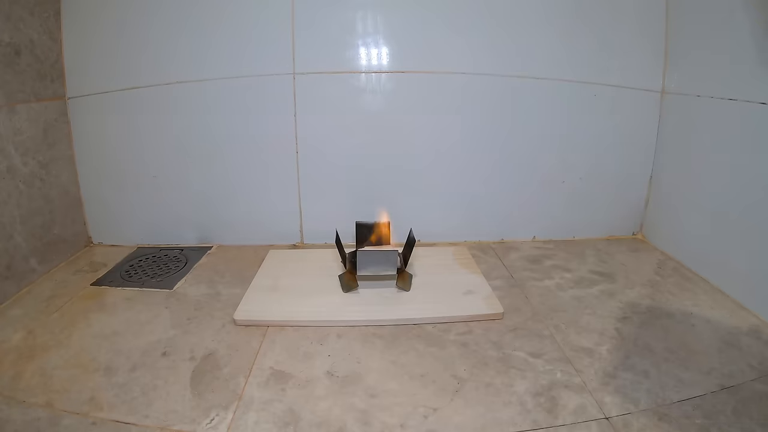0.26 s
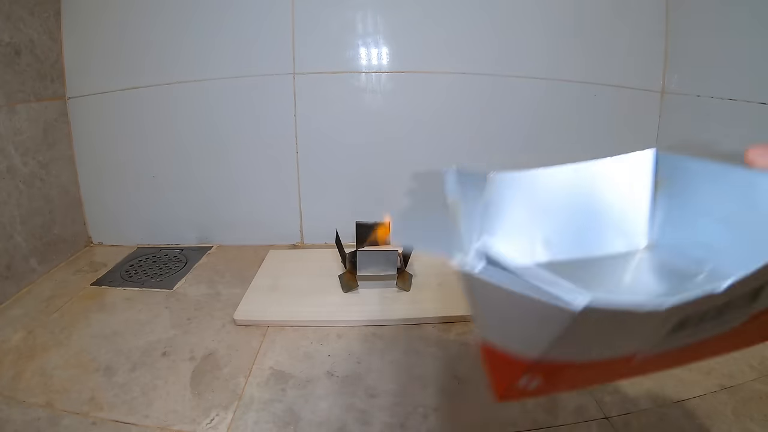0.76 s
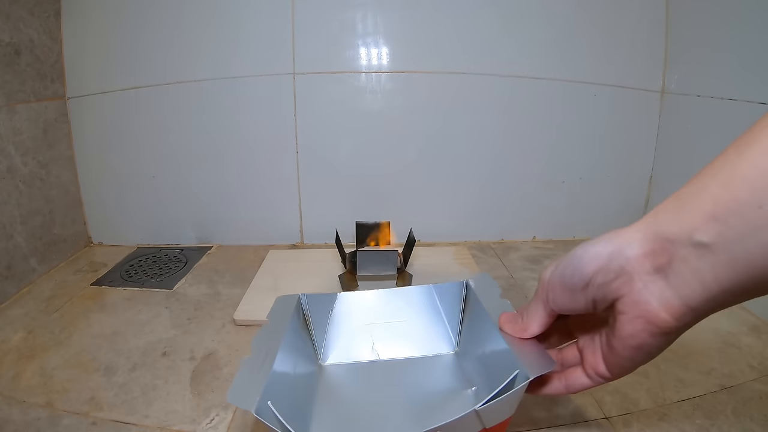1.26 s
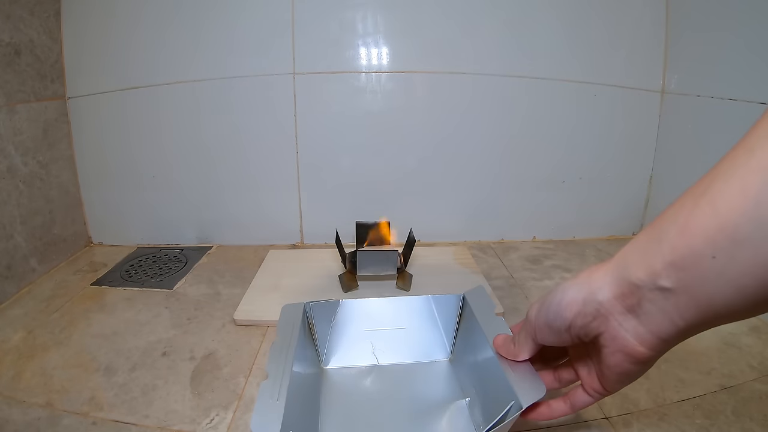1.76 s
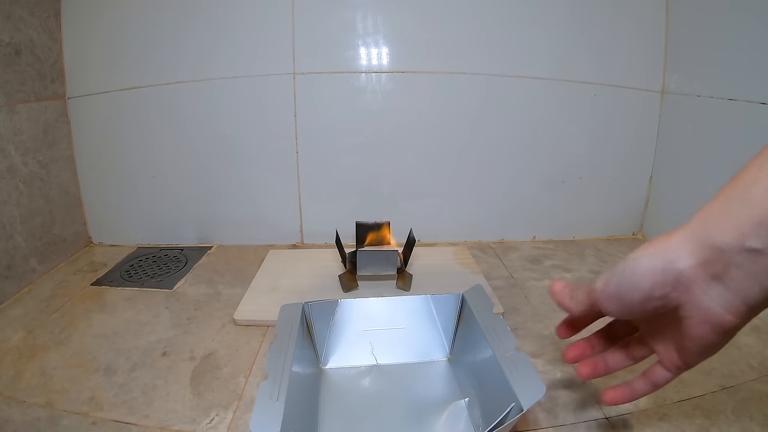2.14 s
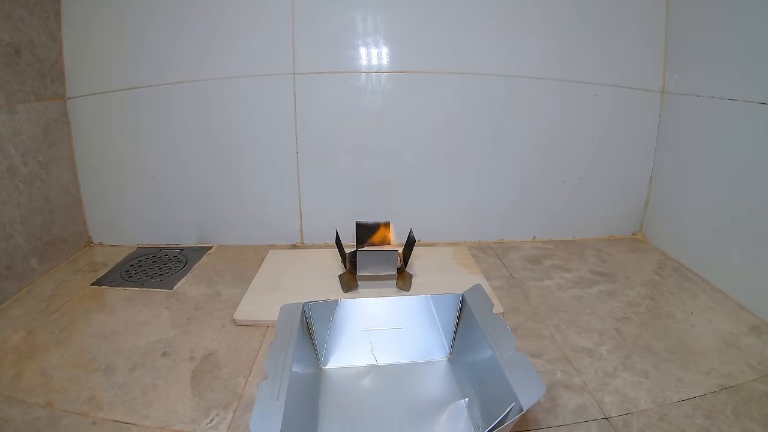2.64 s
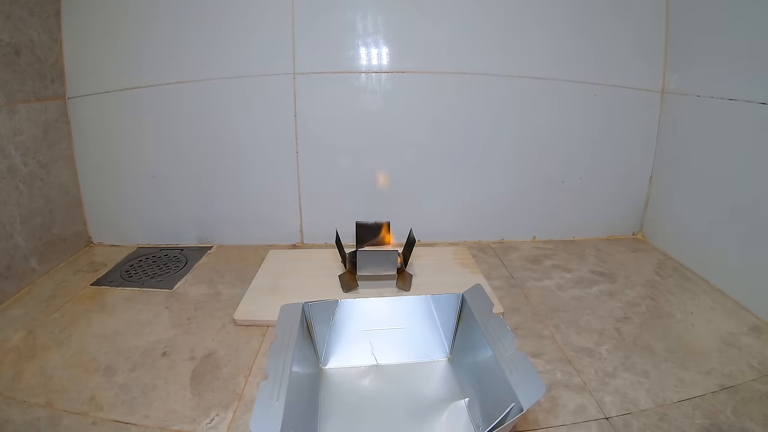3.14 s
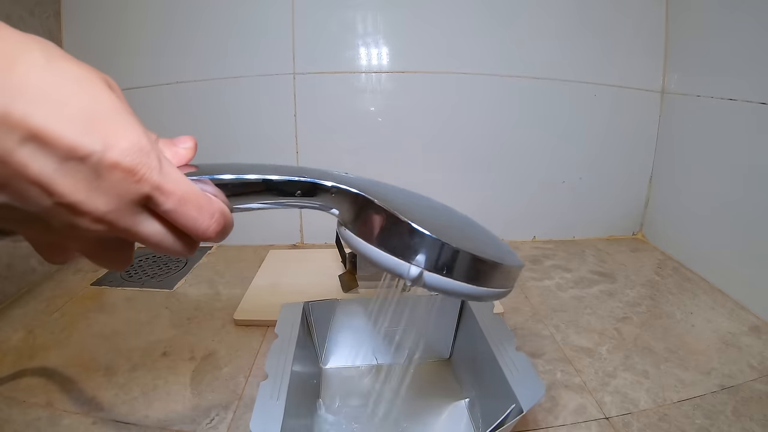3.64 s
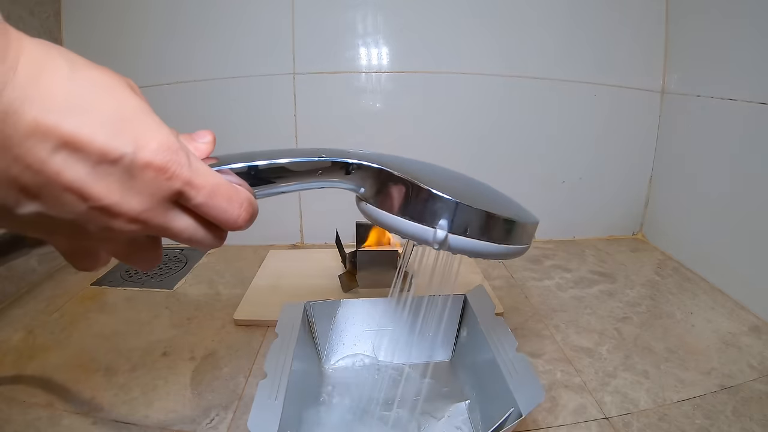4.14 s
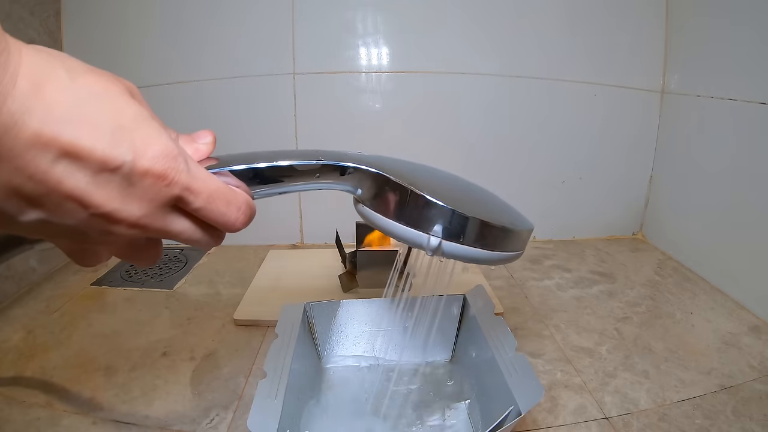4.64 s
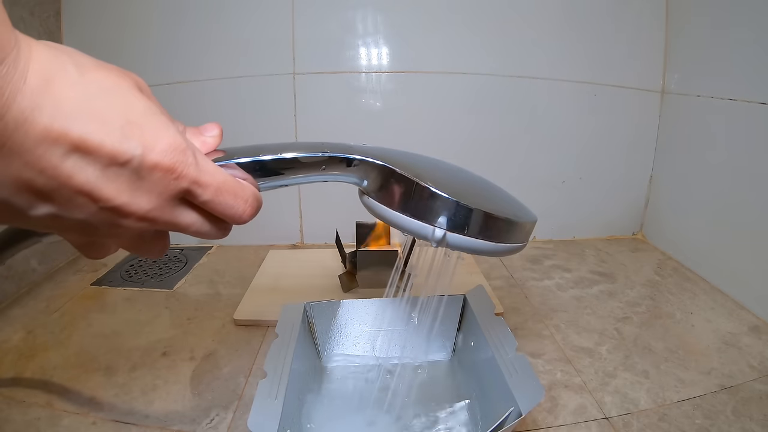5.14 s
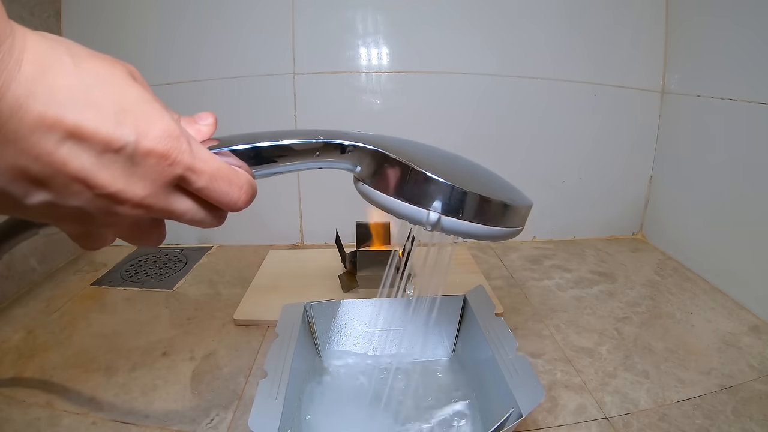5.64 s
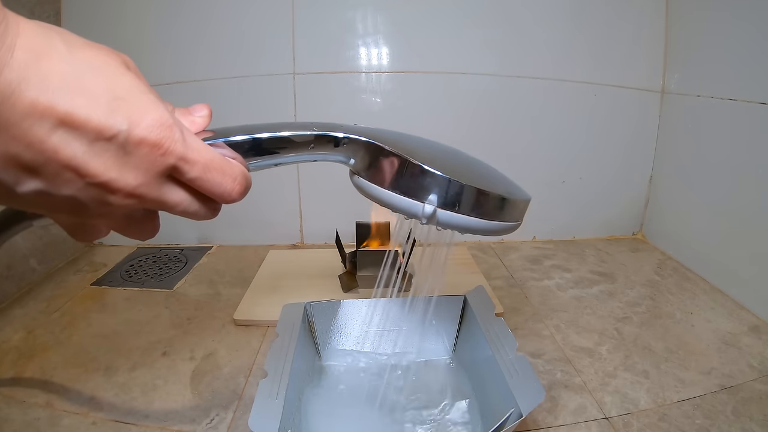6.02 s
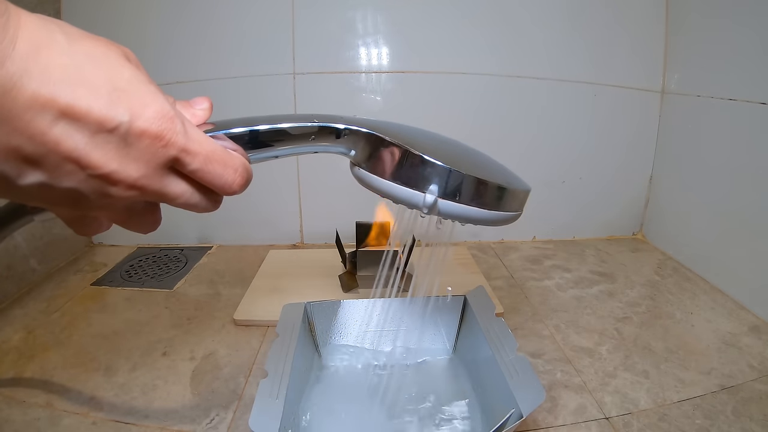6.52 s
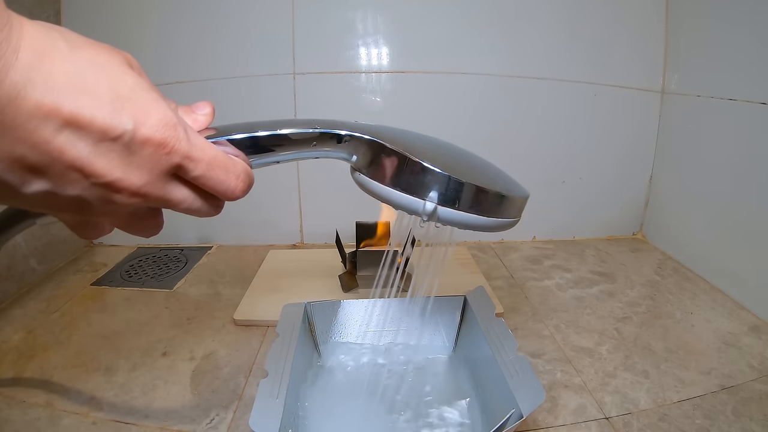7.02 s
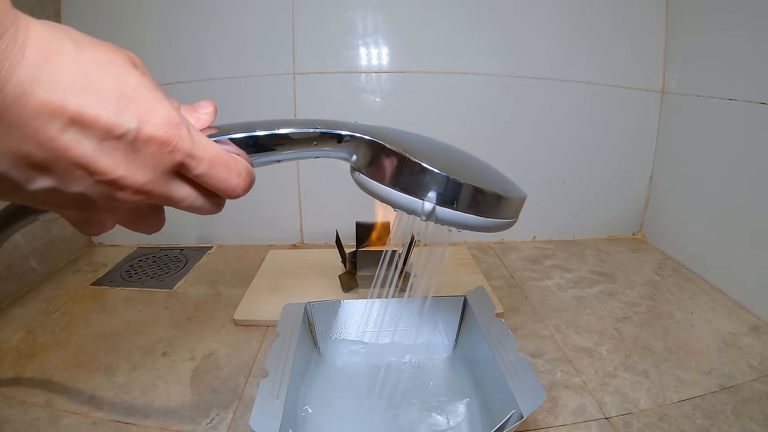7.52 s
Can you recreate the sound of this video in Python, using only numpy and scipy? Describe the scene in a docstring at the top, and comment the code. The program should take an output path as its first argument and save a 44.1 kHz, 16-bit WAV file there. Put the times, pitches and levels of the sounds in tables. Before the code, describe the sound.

Over a low rumble in a tiled shower stall, a folded cardboard pot rustles faintly and is set down with a hollow knock. A few small ticks and rubs follow. A handheld shower head then drips, spits and sprays loudly into the pot, drumming on the card at first, then splashing and bubbling as the water deepens. The microphone is close and the tiles add a short echo.

```python
"""A low rumble fills a tiled shower stall. A folded cardboard pot rustles, knocks down on the floor
and is let go. The shower head is picked up with small ticks and rubs. It drips, spits, then sprays
into the pot: drops splash and drum on the card, and bubbles take over as the water deepens.
The tiles echo throughout, and a close mono microphone turns its gain down under the spray."""
import sys
import numpy as np
from scipy import signal
from scipy.fft import rfft, irfft
from scipy.io import wavfile
from scipy.ndimage import uniform_filter1d

SR = 44100
rng = np.random.default_rng(int(sys.argv[2]) if len(sys.argv) > 2 else 0)


def persist_wave(psi):
    """Save psi, clipped to +-1, as 16-bit WAV."""
    counts = np.round(np.clip(psi, -1, 1) * 32767).astype(np.int16)
    wavfile.write(sys.argv[1], SR, np.atleast_2d(counts).T)


N = 342657
TIME = np.arange(N) / SR


def undb(db):
    """Turn decibels into a number to multiply by."""
    return 10 ** (np.asarray(db) / 20)


def unit(x):
    """Scale a sound to an average (rms) level of 1."""
    return x / np.sqrt(np.mean(x ** 2))


def at_pitch(points, hz):
    """Read between (pitch_hz, value) points, with every octave equally wide."""
    pitches, values = np.transpose(points)
    return np.interp(np.log(np.maximum(hz, 1)), np.log(pitches), values)


def convolve(x, response):
    """Let every sample of x set off its own copy of the response."""
    return signal.fftconvolve(x, response)[:N]


def colour(points, size=16384):
    """A click of energy 1 with the tone of (pitch_hz, level_db) points, for use as a filter."""
    cepstrum = irfft(np.log(undb(at_pitch(points, np.fft.rfftfreq(size, 1 / SR)))))
    # fold the second half onto the first, so nothing sounds before the click starts
    cepstrum[1:size // 2] *= 2
    cepstrum[size // 2 + 1:] = 0
    response = irfft(np.exp(rfft(cepstrum)))
    return response / np.linalg.norm(response)


def resonate(x, peaks):
    """Make a sound ring at each (pitch_hz, width_hz, level_db) peak."""
    return sum(undb(db) * signal.lfilter(*signal.iirpeak(hz, hz / width, fs=SR), x)
               for hz, width, db in peaks)


def wander(rate_hz):
    """A smooth random drift, mostly between -1 and 1."""
    hold = int(SR / rate_hz)
    steps = np.repeat(rng.standard_normal(N // hold + 1), hold)
    return 1.2 * uniform_filter1d(steps, hold)[:N]


def impacts(per_s, spread_db):
    """Tiny clicks of unequal size at random times."""
    hit = rng.random(N) < per_s / SR
    size = undb(spread_db * np.clip(rng.standard_normal(N), -3, 3))
    return unit(hit * size * rng.choice([-1, 1], N))


def swell(start_s, length_s, rise_s, fade_s):
    """A level that rises, holds until its length is over and dies away."""
    age = TIME - start_s
    return np.clip(age / rise_s, 0, 1) * np.exp(-np.maximum(age - length_s, 0) / fade_s)


# tone of the background rumble: pitch_hz, level_db
RUMBLE_TONE = [(4, -2), (15, -1), (22, -2.5), (33, -14), (49, -8), (68, -15.5), (90, -20), (125, -30.5),
               (220, -39), (400, -43.5), (800, -42.5), (1600, -51.5), (4000, -53), (9000, -55),
               (16000, -65)]
# notes of the air between the walls (standing waves): pitch_hz, width_hz, level_db
STALL_NOTES = [(87, 3.4, 5), (181.4, 26, -10.5), (256.5, 7.8, -9.5), (346.7, 9.5, -10.5), (421, 2.2, -9),
               (586, 3.6, -15), (695, 13, -23)]

def room_tone(rumble_db=-33, hum_db=-48):
    """A deep, unsteady rumble with faint hiss, and the hum of the air in the stall."""
    rumble = convolve(rng.standard_normal(N), colour(RUMBLE_TONE)) * undb(rumble_db + 0.55 * wander(8.9))
    hum = unit(resonate(rng.standard_normal(N), STALL_NOTES))
    return rumble + undb(hum_db) * hum


# time the echoes take to fade by 60 dB: pitch_hz, ring_s
ECHO_FADE = [(150, 1), (400, 0.44), (1000, 0.99), (2800, 0.53), (7300, 0.3), (15000, 0.093)]
# tone of the echoes: pitch_hz, level_db
ECHO_TONE = [(130, -5.5), (350, 1.5), (800, 5.5), (2000, 2), (6000, -1.5), (16000, 5.5)]

def tile_echoes(sound, gap_s=0.004):
    """Sound bounces between the tiled walls in a blur of echoes; the treble dies first."""
    t, tail = TIME[:SR], 0
    spectrum = rfft(rng.standard_normal(SR))
    pitches = np.maximum(np.fft.rfftfreq(SR, 1 / SR), 1)
    for hz in 125 * 2 ** np.arange(8):
        octave = irfft(spectrum * np.maximum(1 - np.abs(np.log2(pitches / hz)), 0))
        tail = tail + octave * undb(-60 * t / at_pitch(ECHO_FADE, hz))
    tail = tail * (t > gap_s)
    echoes = convolve(sound, tail / np.linalg.norm(tail))
    return convolve(echoes, colour(ECHO_TONE))


# tone of rubbing: pitch_hz, level_db
RUB_TONE = [(200, -46), (700, -28), (1800, 10), (4000, 6), (7500, 9), (11000, -1), (16000, -28)]
# the pot is carried, slid and let go, then the hose is drawn up: start_s, length_s, rub_db, flex_db
STROKES = [(.4, 0.34, -65, -55), (.55, 0.43, -72, -57), (0.866, 0.39, -72, -49), (1.625, .22, -50.5, -46.5),
           (1.93, 0.15, -48.5, -48), (2.173, 0.099, -64, -47), (2.477, 0.3, -56, -56),
           (2.788, 0.11, -53, -71), (3.036, 0.69, -57, -57)]

def handling(level_db=-2, catch_db=2.5):
    """Rubbing is many tiny slips that catch now and then; flexing card drones on its low notes."""
    rub = convolve(impacts(per_s=3000, spread_db=3), colour(RUB_TONE)) * undb(catch_db * wander(40))
    flex_notes = [(269, 20, 13), (342, 8.4, 4), (396, 11, 2), (800, 390, -17)]
    flex = unit(resonate(impacts(per_s=390, spread_db=5.5), flex_notes))
    out = np.zeros(N)
    for start, length, rub_db, flex_db in STROKES:
        speed = np.sin(np.pi * np.clip((TIME - start) / length, 0, 1))  # speeds up, then slows
        out += speed ** 0.66 * (undb(rub_db) * rub + undb(flex_db) * flex)
    return undb(level_db) * out


# small ticks: start_s, level_db, body_db (added to level_db for the duller part)
TICK_TIMES = [(.468, -43, -14), (.575, -44, -12), (.605, -40, -17), (.646, -49, -6), (1.303, -47, -10),
              (1.854, -38.5, -10), (1.982, -40, -3), (1.998, -39, -1), (2.104, -40, -11), (2.202, -41, -8),
              (2.801, -30.5, -27), (3.307, -40, -8), (3.332, -49.5, -12), (3.378, -41, -18)]
# tone of a tick's bright part: pitch_hz, level_db
TICK_TONE = [(200, -3), (1500, -8.5), (4000, -5), (7300, 0), (10500, -6.5), (16000, -15)]

def ticks(fade_s=0.0071, bright_db=-8, dull_db=-9):
    """The card and the shower head give brief crackles, each with a duller body."""
    t, crack, body = TIME[:SR // 10], np.zeros(N), np.zeros(N)
    for start, db, body_db in TICK_TIMES:
        burst = undb(db) * rng.standard_normal(len(t)) * np.exp(-t / fade_s)
        i = int(start * SR)
        crack[i:i + len(t)] += burst
        body[i:i + len(t)] += burst * undb(body_db)
    dull = colour([(160, -36), (550, -16), (1700, -16), (2400, -7), (6000, -1)])
    return undb(bright_db) * convolve(crack, colour(TICK_TONE)) + undb(dull_db) * convolve(body, dull)


# the pot meets the floor, settles and is let go: start_s, level_db, contact_s
POT_KNOCKS = [(1.498, -10, 0.00049), (1.5048, -1, 0.0025), (1.683, -26, 0.00082), (1.745, -31, 0.00059),
              (1.984, -25.5, 0.00031), (1.997, -40, 0.00096)]
# the first lumps of water thump the dry bottom: start_s, level_db
WATER_THUMPS = [(3.59, -16), (3.621, -10.5), (3.82, -16), (3.933, -12)]
# notes of the struck pot: pitch_hz, level_db, ring_s (time to fade by 60 dB)
POT_NOTES = [(189.6, -23.5, 0.44), (308, -18, 0.11), (337, -1.5, 0.06), (346, -3, 0.24), (396, -10.5, .2),
             (477, -2.5, 0.038), (616, -13.5, 0.3), (670, -11, 0.037), (715, -23, 0.046), (830, -10, 0.028),
             (1070, -10, 0.068), (1180, -25, 0.052), (1666, -5, 0.064), (3130, -7, 0.025)]
# tone of loose card slapping: pitch_hz, level_db
SLAP_TONE = [(100, -31), (200, -9), (350, -3), (700, -25), (1200, -7), (2000, -26), (3400, -14), (9000, -7),
             (16000, -32)]

def knocks(ring_db=-13, water_contact_s=0.0025, slap_db=-23, slap_s=0.015):
    """Each blow rings the pot and slaps its loose card; a longer contact sounds duller."""
    t, pushes = TIME[:SR], np.zeros(N)
    ring = sum(undb(db - 60 * t / ring_s) * np.cos(2 * np.pi * hz * t) for hz, db, ring_s in POT_NOTES)
    slap = convolve(rng.standard_normal(SR) * np.exp(-t / slap_s), colour(SLAP_TONE))
    thumps = [(start, db, water_contact_s) for start, db in WATER_THUMPS]
    for start, db, contact_s in POT_KNOCKS + thumps:
        push = np.exp(-2 * np.pi * t[:SR // 10] / contact_s)
        i = int(start * SR)
        pushes[i:i + len(push)] += undb(db) * push / push.sum()
    return undb(ring_db) * convolve(pushes, ring) + undb(slap_db) * convolve(pushes, slap)


# lone fat drops ahead of the spray: start_s, level_db
DRIPS = [(3.448, -28.5), (3.495, -37), (3.504, -46), (3.542, -27), (3.554, -22)]

def drips(splat_s=0.0053, bright_db=-7, spatter_db=-15):
    """Each drop flattens on the dry card and rings the same notes as the spray below."""
    t, splats = TIME[:SR // 20], np.zeros(N)
    for start, db in DRIPS:
        i = int(start * SR)
        splats[i:i + len(t)] += undb(db) * rng.standard_normal(len(t)) * np.exp(-t / splat_s)
    card = resonate(splats, BOTTOM_NOTES) + undb(bright_db) * resonate(splats, DRY_NOTES)
    return card + undb(spatter_db) * convolve(splats, colour(SPLASH_TONE))


FIRST_SPURT_S, STEADY_FLOW_S, FLOW_RISE_S = 3.488, 3.722, 0.019

def depth(fill_s=3.365):
    """The pool deepens steadily from 0 (dry) to 1 (as deep as the jets reach)."""
    return np.clip((TIME - STEADY_FLOW_S) / fill_s, 0, 1)


def covered(halfway_s=4.89, spread_s=0.19):
    """How much of the pot's bottom lies under water, from 0 to 1."""
    return 0.5 + 0.5 * np.tanh((TIME - halfway_s) / (2 * spread_s))


# how loud a bubble of each pitch is: pitch_hz, level_db
BUBBLE_LEVELS = [(400, -24), (630, -7.5), (780, -5), (950, 1), (1250, -2.5), (1600, -3), (3000, -15)]

def bubbles(count=4500, cycles=14, glide=0.11, spread_db=2, shallow_hz=878, deep_hz=454):
    """Trapped air rings briefly and rises in pitch; deeper water holds larger, lower bubbles."""
    out = np.zeros(N + SR)
    lowest_hz = shallow_hz * (deep_hz / shallow_hz) ** depth()
    for when, smallness, strength in rng.random((count, 3)):
        i = int((FIRST_SPURT_S + when * (TIME[-1] - FIRST_SPURT_S)) * SR)
        hz = lowest_hz[i] * 4.17 ** smallness  # up to about two octaves higher
        t = np.arange(int(SR * 2 * cycles / hz)) / SR
        age = t * hz / cycles
        level_db = at_pitch(BUBBLE_LEVELS, hz) + spread_db * min(-np.log(1 - strength), 3)
        chirp = np.sin(2 * np.pi * hz * t * (1 + glide * age / 2))
        out[i:i + len(t)] += undb(level_db) * np.exp(-np.pi * age) * chirp
    return out[:N] / np.std(out[int(FIRST_SPURT_S * SR):N])


# notes of the air in and around the pot: pitch_hz, width_hz, level_db
HOLLOW_NOTES = [(195, 17, 2.5), (242, 19, -1.5), (348, 17, 5.5), (411, 34, 0.5), (518, 45, -4.5),
                (647, 190, -5.5), (948, 87, -0.5), (1090, 72, 0.5), (1178, 51, 3.5), (1340, 100, 3)]

def bubbling(drops, level_db=2, foam_db=-13.5, shallow_db=-28.5, deep_db=-8.5):
    """The jets whip the first film of water into foam, then stir up more bubbles as the pool deepens."""
    churn = convolve(drops, colour([(60, 10), (180, -12.5), (400, -0.5), (1000, 2.5), (3000, -22)]))
    froth = bubbles() + 0.44 * churn
    in_pot = 0.6 * froth + 1.33 * resonate(froth, HOLLOW_NOTES)
    foam = undb(foam_db) * swell(FIRST_SPURT_S, length_s=0.5, rise_s=FLOW_RISE_S, fade_s=0.16)
    pool = undb(shallow_db + (deep_db - shallow_db) * depth())
    surges = undb(level_db + 0.69 * wander(6.8))  # air is dragged under unevenly
    return in_pot * np.hypot(foam, pool) * surges


# tone of drummed card: pitch_hz, level_db
CARD_TONE = [(100, -3.5), (300, -30), (600, -34.5), (1000, -1), (1600, 5), (2600, -10.5), (4000, 4),
             (8000, -19.5)]
# notes of the pot's bottom: pitch_hz, width_hz, level_db
BOTTOM_NOTES = [(511, 27, -4.5), (946, 37, 5), (1208, 43, 2.5), (1313, 87, 3), (1785, 270, -2),
                (2360, 470, -1), (2700, 72, -2.5), (4690, 550, 1), (5500, 370, 2.5)]
# the pitch favoured as the jets move over the bottom: time_s, pitch_hz
SPOT_PITCH = [(3.78, 1760), (3.97, 1700), (4.1, 1430), (4.33, 2340), (4.52, 2150), (4.7, 1320), (5.1, 1700),
              (6, 2440)]

def drumming(card_db=-3, bottom_db=3, favour_db=8.5, reach_octaves=0.6, level_db=-1, cushion_db=-8.5):
    """Heavy drops beat the card, favouring notes that suit the spot hit, until water cushions them."""
    blows = impacts(per_s=2600, spread_db=3)
    spot_hz, bottom = np.interp(TIME, *np.transpose(SPOT_PITCH)), 0
    for hz, width, db in BOTTOM_NOTES:
        nearness = np.exp(-(np.log2(hz / spot_hz) / reach_octaves) ** 2)
        bottom = bottom + undb(favour_db * nearness) * resonate(blows, [(hz, width, db)])
    drum = undb(card_db) * convolve(blows, colour(CARD_TONE)) + undb(bottom_db) * unit(bottom)
    return drum * undb(level_db + cushion_db * covered() + 0.43 * wander(22))


# tone of splashing drops: pitch_hz, level_db
SPLASH_TONE = [(100, -36), (300, -39.5), (600, -17), (1200, -10), (2500, -3.5), (4000, -3.5), (5700, -5.5),
               (7300, -0.5), (9800, -5), (11500, -10.5), (14000, -14), (16000, -18.5)]
# bright bands that come and go as the jets move: pitch_hz, width_hz, level_db
SHEEN_BANDS = [(2830, 240, 4), (3900, 540, 0.5), (5760, 1500, 7), (6730, 990, 1)]
# higher notes of the bottom while it is dry: pitch_hz, width_hz, level_db
DRY_NOTES = [(2400, 180, 7), (3900, 76, 14), (6660, 100, 7), (7400, 190, -5), (8750, 440, -10)]
# tone of jets bursting into mist on bare card: pitch_hz, level_db
MIST_TONE = [(2000, -21), (6000, -3), (9500, 1), (16000, -12)]

def splashing(drops, splash_db=4.5, sheen_db=-2, dry_db=6, wetting_s=0.053, mist_db=4, mist_s=0.21):
    """Fine drops hiss as they land; the dry ring and the mist die away as the card gets wet."""
    level = undb(splash_db + 0.73 * covered() + 0.27 * wander(11))  # a little louder on water
    splash = level * convolve(drops, colour(SPLASH_TONE))
    patter = impacts(per_s=4000, spread_db=1.5)
    sheen = unit(sum(undb(0.73 * wander(2.37)) * resonate(patter, [band]) for band in SHEEN_BANDS))
    wet_for_s = np.maximum(TIME - FIRST_SPURT_S, 0)
    dry_ring = np.exp(-wet_for_s / wetting_s) * unit(resonate(drops, DRY_NOTES))
    mist = np.exp(-wet_for_s / mist_s) * convolve(drops, colour(MIST_TONE))
    return splash + undb(sheen_db) * sheen + undb(dry_db) * dry_ring + undb(mist_db) * mist


# spurts of fine and heavy drops, compared with the steady flow: start_s, length_s, fine_db, heavy_db
HOSE_SPURTS = [(3.488, 0.092, -35.5, -25), (3.549, 0.0055, -19, -20.5), (3.59, 0.032, -6, -24),
               (3.617, 0.011, -7, -1.5), (3.651, 0.078, -8.5, -9.5), (3.682, .01, -15, -20)]

def shower(level_db=-17.5, surge_db=0.2, surge_s=0.12):
    """Air in the hose makes the water spit; then pent-up pressure opens the flow with a slight surge."""
    age = TIME - STEADY_FLOW_S
    surge = undb(surge_db * np.exp(-np.maximum(age, 0) / surge_s))
    fine = heavy = np.clip(age / FLOW_RISE_S, 0, 1) * surge
    for start, length, fine_db, heavy_db in HOSE_SPURTS:
        spurt = swell(start, length, rise_s=0.0065, fade_s=0.026)
        fine = np.hypot(fine, undb(fine_db) * spurt)
        heavy = np.hypot(heavy, undb(heavy_db) * spurt)
    level = undb(level_db + 0.43 * wander(30))
    drops = impacts(per_s=11000, spread_db=3.5)
    return level * (fine * splashing(drops) + heavy * (drumming() + bubbling(drops)))


def scene(echo_db=-10):
    """Pot and water close by, with their echoes and the rumble, the same left and right."""
    direct = handling() + ticks() + knocks() + drips() + shower()
    return np.tile(direct + undb(echo_db) * tile_echoes(direct) + room_tone(), (2, 1))


def record(dry, loud_db=-23, settle_s=0.18, squeeze=0.49, top_hz=15750):
    """Automatic gain eases down as the sound gets loud, and the highest treble is cut."""
    step = 1 / (settle_s * SR)
    power = signal.lfilter([step], [1, step - 1], dry.mean(axis=0) ** 2)  # running average
    gain = (1 + power / undb(loud_db) ** 2) ** (-squeeze / 2)
    treble_cut = signal.ellip(10, 0.2, 70, top_hz, fs=SR, output="sos")
    return signal.sosfilt(treble_cut, dry * gain)


dry = scene()
out = record(dry)
persist_wave(out)
```